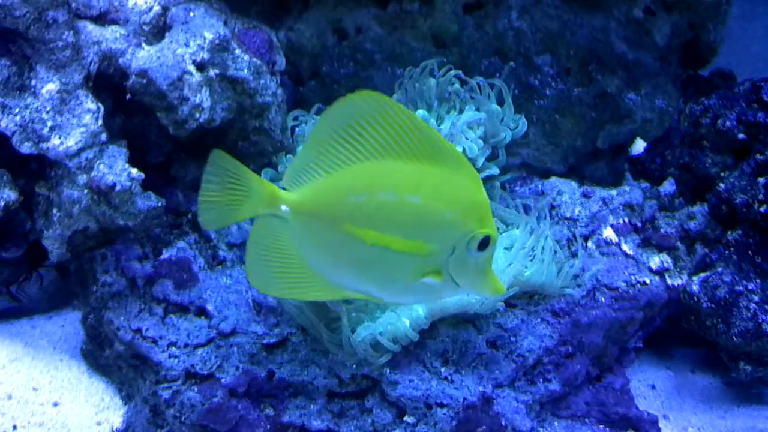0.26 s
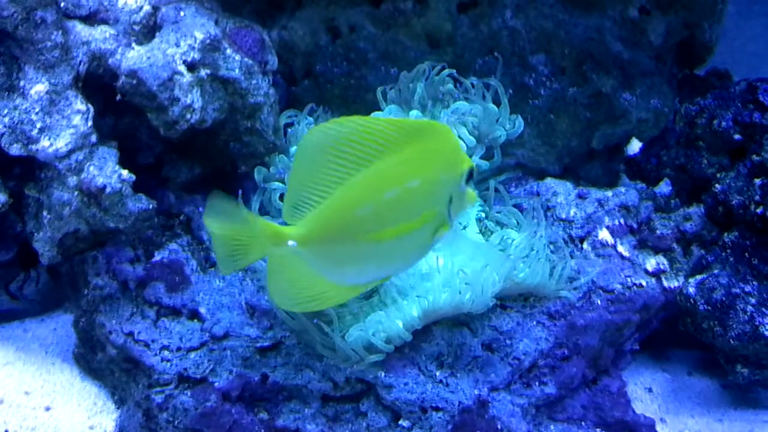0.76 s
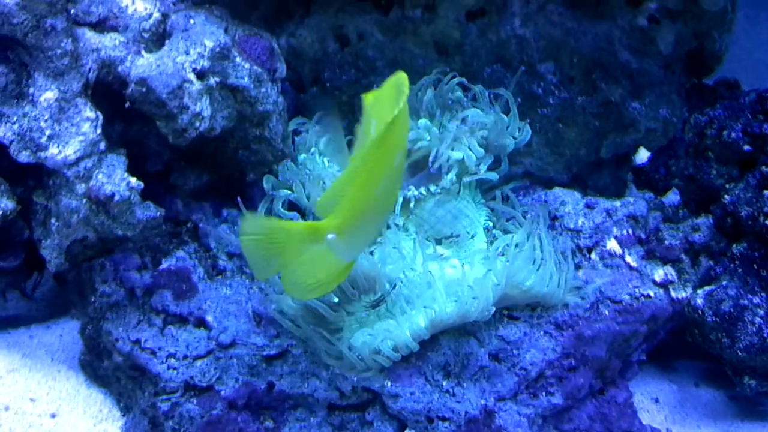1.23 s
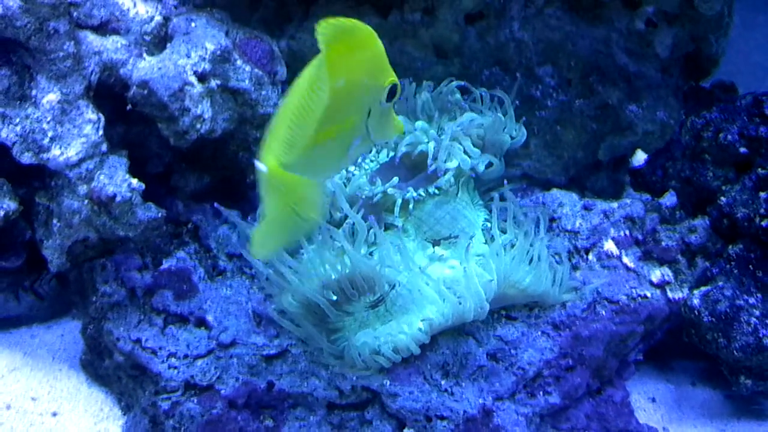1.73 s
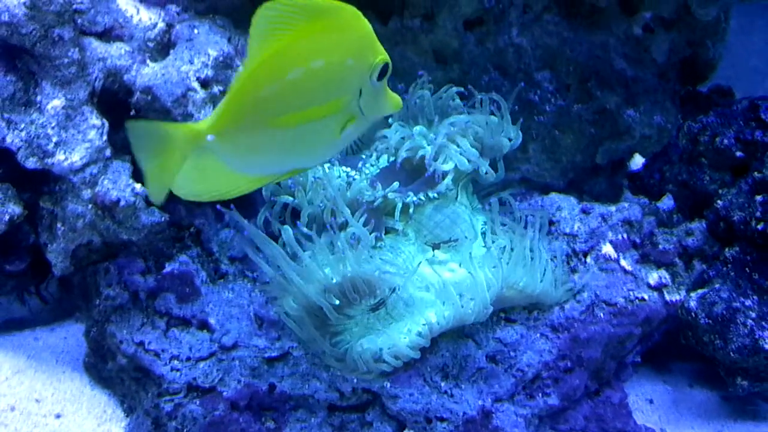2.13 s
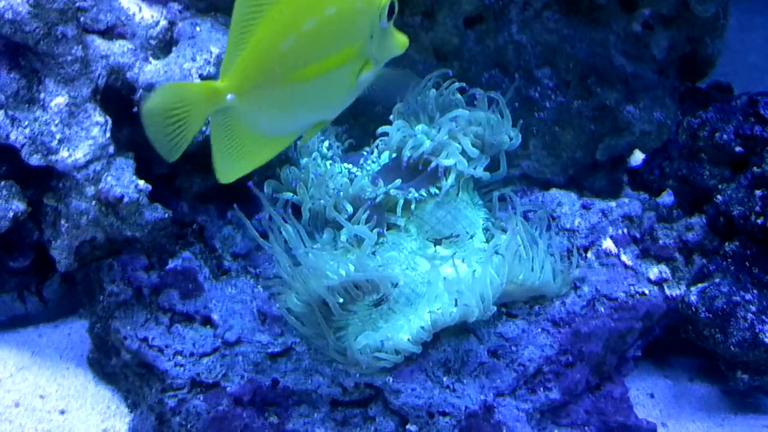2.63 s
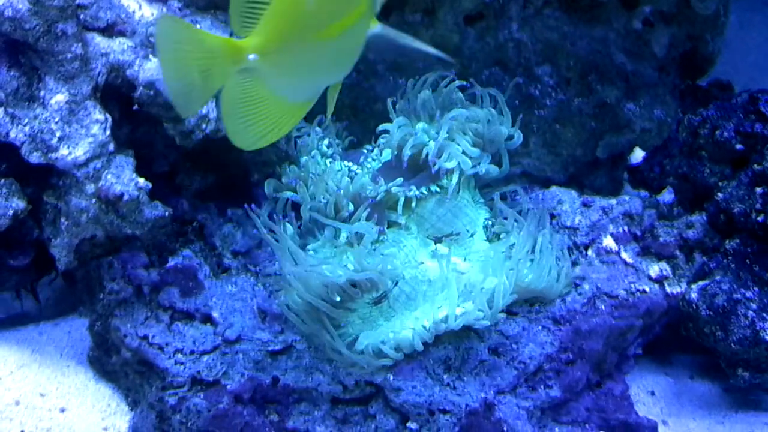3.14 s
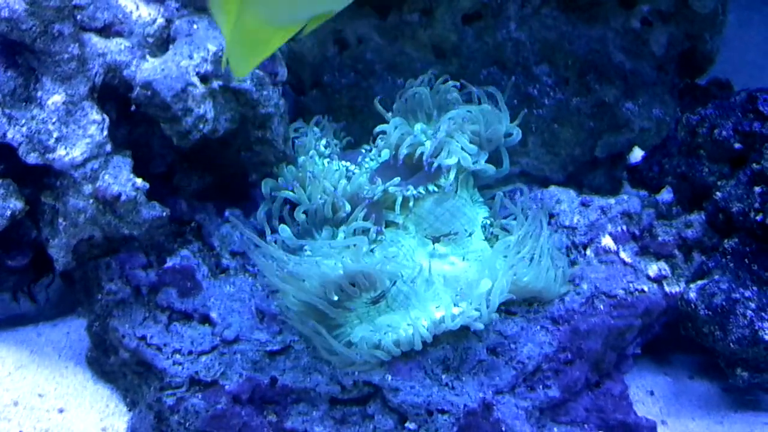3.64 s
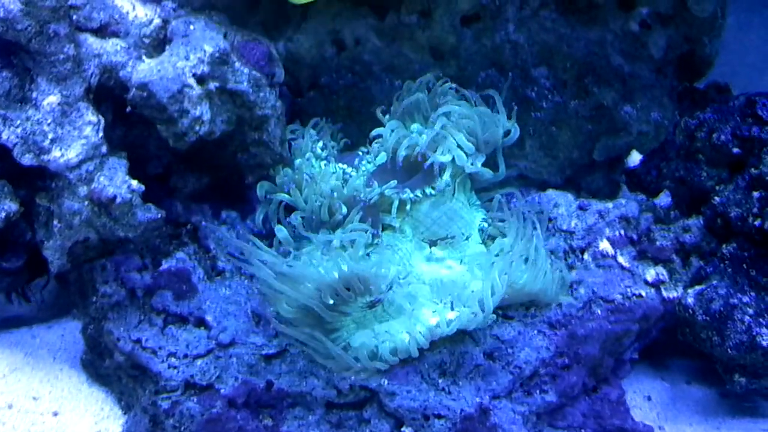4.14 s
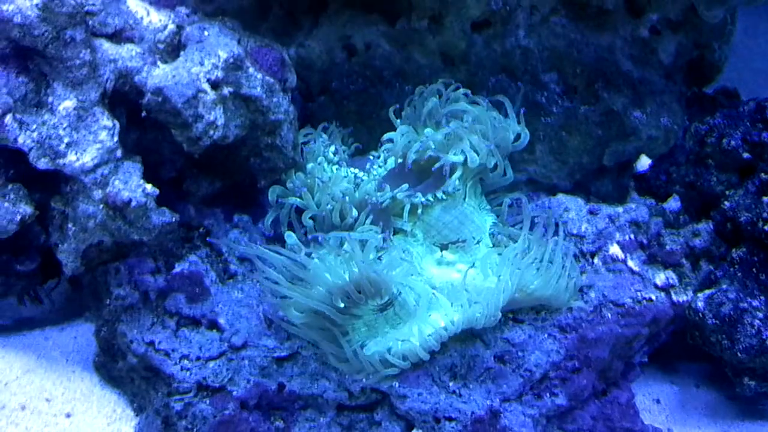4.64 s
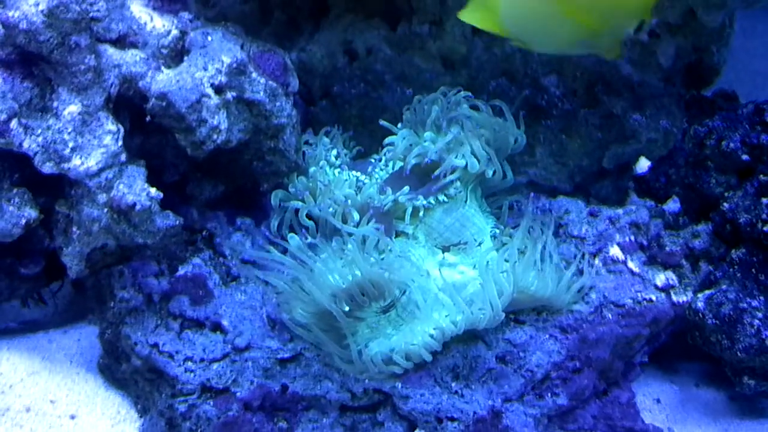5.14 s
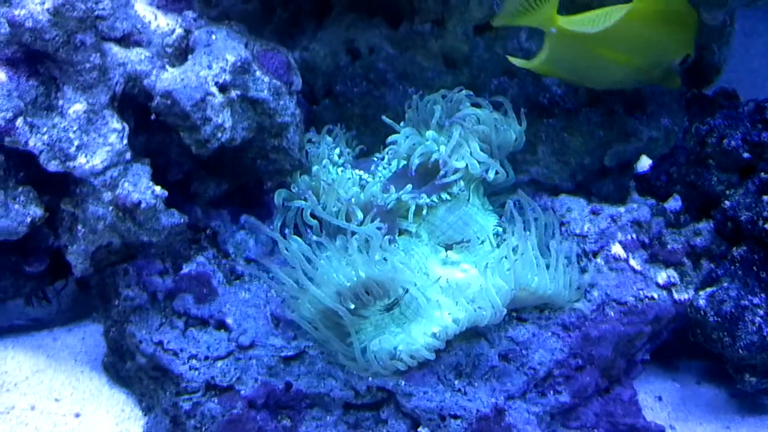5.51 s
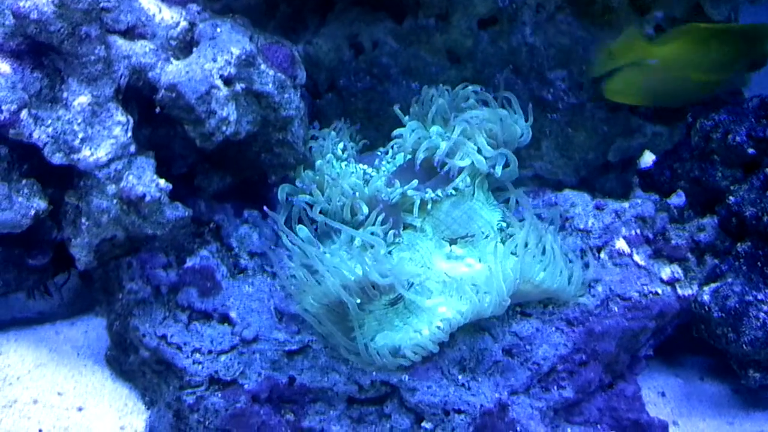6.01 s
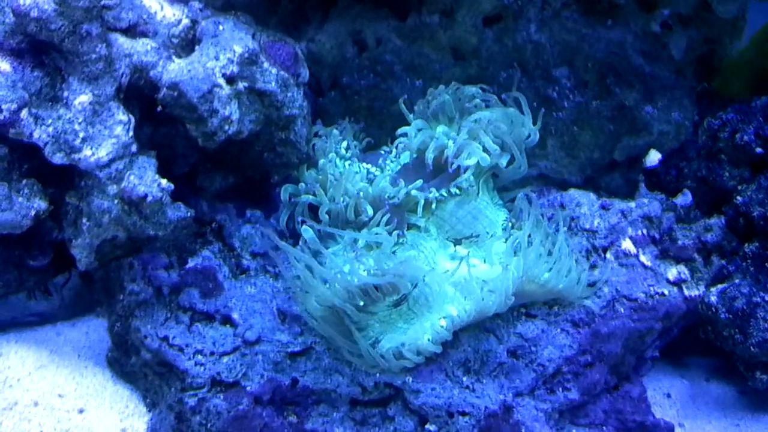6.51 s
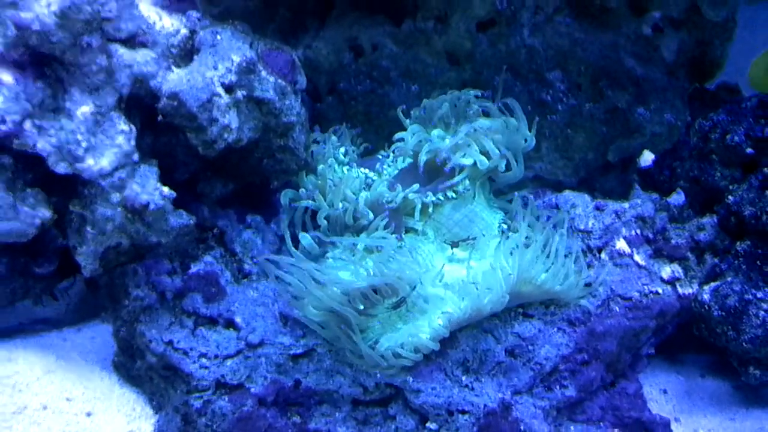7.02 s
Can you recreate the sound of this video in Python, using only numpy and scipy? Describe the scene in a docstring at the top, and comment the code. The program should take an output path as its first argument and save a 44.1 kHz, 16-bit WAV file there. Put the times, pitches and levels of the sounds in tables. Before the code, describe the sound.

Aquarium pumps drone with a low electric hum, buzz and soft hiss, fading in, with faint trickling, two tiny pops and a closing knock.

```python
"""A steady hum and buzz fills a quiet room, with faint whines, rumble, hiss and trickling water; it fades in.
Two small pops are heard, and knocks on the camera body at the end. Two microphone ports some distance apart
hear aquarium pumps and fans: motors and rotors are sums of sines, and the buzz is one repeated cycle.
Rumble and hiss are shaped noise, splashes are dying noise bursts, pops are short falling tones,
and knocks are two dying resonances."""
import sys
import numpy as np
from scipy import signal
from scipy.fft import rfft, irfft, next_fast_len
from scipy.io import wavfile
from scipy.ndimage import uniform_filter1d

SR = 44100
rng = np.random.default_rng(int(sys.argv[2]) if len(sys.argv) > 2 else 0)


def store_wav(level_fs):
    """Save 16-bit WAV to argv[1]."""
    pcm = np.round(np.clip(np.atleast_2d(level_fs), -1, 1) * 32767)
    wavfile.write(sys.argv[1], SR, pcm.T.astype(np.int16))


N = 320607  # length in samples

MAINS_HZ = 60.006
EDGE_HZ = 15740  # top of the heard band
# above IN_STEP_HZ the left channel falls about half a cycle further behind every HALF_TURN_HZ
IN_STEP_HZ, HALF_TURN_HZ = 1245, 1208
# the strongest motor tones, levels before the fade-in and wavering:
# (multiple of the mains, left level [dB rms], right level [dB rms])
MOTOR_TONES = [(2, -53.0, -51.0), (3, -46.2, -47.2), (4, -49.5, -61.8), (5, -54.3, -59), (6, -52.2, -54.5),
               (7, -58.8, -72), (8, -60.5, -84.9), (9, -54.9, -57.4), (10, -64.5, -66.6),
               (11, -61.8, -72.0), (13, -62.6, -65.1), (14, -69.4, -71.7), (16, -59.9, -64.2),
               (17, -60, -65.5), (18, -65.6, -74.8), (20, -66.4, -66.5), (29, -72.1, -70.7),
               (33, -74.9, -73.8), (37, -72.0, -71.7), (38, -74.0, -75.2)]


def gain_of(db):
    """Turns decibels into a factor that multiplies the sound wave."""
    return 10 ** (np.asarray(db) / 20)


def read(points, hz):
    """Reads a table's columns at any pitch, by straight lines over the logarithm of frequency."""
    f, *columns = np.transpose(points)
    return np.array([np.interp(np.log(hz + 1), np.log(f + 1), c) for c in columns])


def add(mix, s, sound):
    """Mixes a sound in at a time in seconds, cutting off what runs past the end."""
    part = mix[..., round(s * SR):][..., :sound.shape[-1]]
    part += sound[..., :part.shape[-1]]


def drift(fastest_hz, count):
    """Slow random curves of rms 1: sums of 16 slow sines, the slower ones stronger."""
    t = np.arange(0, N + 256, 256) / SR
    hz = np.geomspace(.2, fastest_hz, 16)
    angle = 2 * np.pi * (hz[:, None] * t + rng.random((count, 16, 1)))
    waves = np.sin(angle) / hz[:, None] ** 0.37
    curves = waves.sum(1)
    curves /= curves.std(1, keepdims=True)
    return [np.interp(np.arange(N) / SR, t, c) for c in curves]


def ports(hz):
    """How alike left and right are set to be (0-1), and by how many radians the left one leads."""
    # (frequency [Hz], lead of the left [radians])
    bass_lead = [(60, 3.4), (110, 0.7), (300, 0.11), (1100, 0.54)]
    # in narrow bands around these pitches left and right are made fully alike, in or out of phase; near # 2.45
    # kHz their sum falls silent: whole half turns, within alike_hz, blending out over alike_fade_hz, only #
    # below alike_top_hz
    alike_hz, alike_fade_hz, alike_top_hz = 112, 195, 4000
    # elsewhere: (frequency [Hz], left-right likeness [0-1])
    likeness = [(60, 0.8), (300, 0.56), (1100, 0.78), (1640, 0.54), (2140, 0.87), (2650, 0.99),
                (2900, 0.47), (3360, 0.83), (4050, 0.57), (4730, 0.83), (6700, 0), (7300, 0.58),
                (11800, 0.23), (15800, 0.3)]
    turns = (hz - IN_STEP_HZ) / HALF_TURN_HZ
    whole = np.maximum(np.round(turns), 0)
    distance_hz = abs(turns - whole) * HALF_TURN_HZ
    alike = np.clip(1 - (distance_hz - alike_hz) / alike_fade_hz, 0, 1) * (hz < alike_top_hz)
    usual_likeness = np.clip(read(likeness, hz)[0], 0, 1)
    usual_lead = np.where(turns < 0, read(bass_lead, hz)[0], -np.pi * turns)
    usual = np.array([usual_likeness, usual_lead])
    fully_alike = np.array([np.ones_like(whole), -np.pi * whole])
    return (1 - alike) * usual + alike * fully_alike


def port_pair(left, other, level_db, hz):
    """Spectra at the two ports: partly shared, phase-shifted, and equally loud where fully shared."""
    same, lead = ports(hz)
    right = same * left * np.exp(-1j * lead) + np.sqrt(1 - same ** 2) * other
    even = same ** 20  # near 1 only where left and right are almost fully alike
    return np.array([left, right]) * gain_of((1 - even) * level_db + even * level_db.mean(0))


def port_noise(spectrum):
    """Random noise shaped to a spectrum for each port, with cabinet and housing resonances lifting it."""
    # (resonance [Hz], width [Hz], left lift [dB], right lift [dB])
    housings = [(152, 15, 4, 4), (200, 15, 4, 4), (295, 24, 6, 6), (340, 12, 3, 3), (411, 18, 10.5, 7.5),
                (432, 10, 4, 4), (525, 30, 6, 6), (770, 50, 5, 4), (900, 40, 3, 3), (1490, 60, 3, 3),
                (1950, 150, 2, 2), (6110, 50, 3, 5), (12520, 50, 3, 2), (14255, 70, 2, 8),
                (14530, 90, 2, 7)]
    size = next_fast_len(N)
    hz = np.fft.rfftfreq(size, 1 / SR)
    level_db = read(spectrum, hz)
    for peak_hz, width, *lift_db in housings:
        level_db = level_db + np.outer(lift_db, 1 / (1 + (2 * (hz - peak_hz) / width) ** 2))
    left, other = rfft(rng.standard_normal((2, size)))
    return irfft(port_pair(left, other, level_db, hz) * np.sqrt(SR / 2), size)[:, :N]


def patchy(x, patch_db, count):
    """Raises and lowers random patches, count times 86 Hz wide and under a tenth of a second long."""
    z = signal.stft(x, nperseg=512)[2]
    patches = rng.standard_normal(z.shape[:0:-1]).T  # one pattern for both ports
    for _ in range(2):
        patches = uniform_filter1d(patches, size=count, axis=0)
        patches = uniform_filter1d(patches, size=8, axis=1)
    lifted = z * gain_of(patch_db * patches / patches.std())
    return signal.istft(lifted, nperseg=512)[1][:, :N]


def tones(rows, wander, waver_db, scatter):
    """Sines with phases scattered over a share of a cycle, whose pitch and level waver a little."""
    out, t = np.zeros((2, N), np.float32), np.arange(N) / SR
    slips, swells = drift(3.03, count=2), drift(6, count=4)
    clocks = [t + wander * np.cumsum(s) / SR for s in slips]  # time running slightly fast or slow
    gains = [np.sqrt(2) * gain_of(waver_db * s).astype(np.float32) for s in swells]  # rms to peak
    for k, (hz, left_db, right_db, lead) in enumerate(rows):
        cycles = hz * clocks[k % 2] + scatter * rng.random()
        angle = (2 * np.pi * (cycles % 1)).astype(np.float32)
        out[0] += gain_of(left_db) * gains[k % 4] * np.sin(angle)
        out[1] += gain_of(right_db) * gains[k % 4] * np.sin(angle - lead)
    return out


def air_and_water():
    """Low noise as the rumble of the housings, and higher noise as hiss that flickers with the flow."""
    # both before the housing lift, patches, drift and fade-in:
    # (frequency [Hz], left density [dB per Hz], right density [dB per Hz])
    rumble_spectrum = [(35, -100, -99), (55, -91, -88), (79, -85, -82.5), (112, -87, -80),
                       (138, -75.5, -79), (218, -71, -71.5), (360, -69, -73.5), (480, -76, -79),
                       (586, -76.5, -79), (847, -82.5, -84.5), (990, -84.5, -86), (1190, -83, -83),
                       (1415, -91, -90.5), (1486, -91, -88), (1720, -110, -110)]
    hiss_spectrum = [(1350, -110, -110), (1480, -90.5, -89), (2170, -91, -93.5), (2400, -88, -92),
                     (3670, -93.5, -93.5), (4600, -93, -88.5), (5720, -99.5, -94), (6950, -91.5, -100),
                     (8900, -96, -97), (9700, -99.3, -99.7), (13000, -102.3, -102.2), (13700, -103, -103),
                     (14600, -102, -102), (15700, -102.5, -102)]
    slow, flicker = drift(4.3, count=1)[0], drift(14, count=1)[0]
    rumble = patchy(port_noise(rumble_spectrum), patch_db=1.4, count=2) * gain_of(0.43 * slow)
    hiss = patchy(port_noise(hiss_spectrum), patch_db=1.3, count=16) * gain_of(0.45 * flicker)
    return rumble + hiss


def buzz():
    """A faint buzz: one mains cycle of weak multiples with scattered levels, repeated."""
    # typical level before scatter, evening out and fade-in: (frequency [Hz], level [dB rms])
    buzz_levels = [(1200, -83), (1900, -78), (2500, -82), (3100, -81), (4500, -85), (6000, -89),
                   (7500, -85), (9300, -91.5), (9600, -110)]
    count = 4096  # points in the cycle
    k = np.arange(count // 2 + 1)
    strong = np.isin(k, [row[0] for row in MOTOR_TONES])
    weak = (k > 13) & (k * MAINS_HZ < EDGE_HZ) & ~strong
    level_db = read(buzz_levels, k * MAINS_HZ) + 4.2 * rng.standard_normal((2, len(k)))
    left, other = weak * np.exp(2j * np.pi * 0.59 * rng.random((2, len(k))))
    cycle = irfft(port_pair(left, other, level_db, k * MAINS_HZ)) * count / np.sqrt(2)
    place = np.arange(N) * MAINS_HZ / SR % 1 * count
    return np.array([np.interp(place, np.arange(count), c, period=count) for c in cycle])


def rotors():
    """Blade tones that weaken with pitch; the higher ones are equally loud at both ports."""
    # four rotors, levels before the wavering and fade-in: (base pitch [Hz], multiples heard,
    # left level of the lowest one [dB rms], right level of the lowest one [dB rms])
    rotor_tones = [(130.6, (4, 5, 6), -63.5, -66.5), (228.15, (2, 3, 4, 8), -62.5, -64.5),
                   (237.2, (3, 4, 6, 8, 11, 15), -63.5, -65.5), (313.6, (2, 4, 7), -68, -74)]
    db_per_octave = -9
    rows = []
    for base_hz, multiples, *db in rotor_tones:
        for k in multiples:
            hz = k * base_hz
            sides = np.array(db) if hz < IN_STEP_HZ else np.full(2, np.mean(db))
            levels = sides + db_per_octave * np.log2(k / multiples[0])
            rows.append((hz, *levels, ports(hz)[1]))
    return tones(rows, wander=0.00062, waver_db=2.5, scatter=0.97)


def splash(db, hz, width, t60):
    """A narrow band of noise that starts within a millisecond and dies by 60 dB in t60 seconds."""
    t = np.arange(6000) / SR
    band = signal.butter(1, [hz - width / 2, hz + width / 2], "bandpass", fs=SR, output="sos")
    noise = signal.sosfilt(band, rng.standard_normal(len(t) + 999))[999:]  # skips the filter's start
    return gain_of(db - 60 * t / t60) * np.minimum(t / .001, 1) * noise / noise.std()


def trickle(per_s, faint_db):
    """Louder splashes at set times and fainter ones at random, shifted in phase between the ports."""
    # level is the noise's rms before onset, decay and fade-in:
    # (time [s], level [dB], pitch [Hz], time to die by 60 dB [s])
    loud_splashes = [(2.8015, -48, 3420, .22), (2.802, -53, 3950, .07), (2.802, -57, 4350, .05),
                     (2.805, -51, 1550, .18), (3.0405, -50, 4000, .11), (3.038, -52, 4900, .06),
                     (3.519, -57, 3330, .25), (3.607, -55, 3150, .09), (4.389, -57.5, 3390, .07),
                     (5.079, -54, 5300, .1), (5.516, -54, 4700, .1), (6.479, -54, 5200, .1)]
    size = next_fast_len(N)
    water = np.zeros(size)
    for s, db, hz, t60 in loud_splashes:
        add(water, s, splash(db, hz, .045 * hz, t60))  # band width is a share of the pitch
    for when, pitch, softness, chance in rng.random((60, 4)):
        if chance < per_s * N / SR / 60:  # gives per_s splashes a second on average
            add(water, when * N / SR, splash(faint_db - 5 * softness, 3600 * 2.4 ** pitch, 900, .12))
    lead = ports(np.fft.rfftfreq(size, 1 / SR))[1]
    return irfft(rfft(water) * np.exp(-1j * np.outer([0, 1], lead)), size)[:, :N]


def pops():
    """Small pops: a few cycles of falling pitch that swell and fade within milliseconds."""
    # (time of the centre [s], peak level [dB], pitch at the centre [Hz], half length [s])
    pop_list = [(3.9760, -28.5, 1200, .0011), (7.0442, -38.5, 1000, .001)]
    fall_hz_per_s = 200000
    out, t = np.zeros((2, N)), np.arange(-441, 441) / SR
    late = np.array([[.0003], [0]])  # seconds: the pops swell later at the left port
    for s, db, hz, half in pop_list:
        swell = np.exp(-((t - late) / half) ** 2)
        wave = np.cos(2 * np.pi * (hz - fall_hz_per_s * t / 2) * t)
        add(out, s + t[0], gain_of(db) * swell * wave)
    return out


def knocks():
    """Short pushes make the camera body ring at two pitches, with opposite swings at the two ports."""
    # level before the push, bass filter and rescaling:
    # (pitch [Hz], level [dB], time to die by 60 dB [s], direction of the first swing [-1 or 1])
    body = [(235, 0, .0133, -1), (124, -26, .085, 1)]
    # (time [s], left peak level [dB], right peak level [dB])
    knock_list = [(7.1808, -15.3, -14), (7.2204, -36, -29)]
    out, t = np.zeros((2, N)), np.arange(8000) / SR
    push = 1 - np.exp(-(t / .0054) ** 2)  # builds over 5.4 ms
    ring = 0
    for hz, db, t60, swing in body:
        ring = ring + swing * gain_of(db - 60 * t / t60) * np.sin(2 * np.pi * hz * t) * push
    # the microphone drops deep bass
    ring = signal.sosfilt(signal.butter(3, 65, "highpass", fs=SR, output="sos"), ring)
    ring = ring / abs(ring).max()
    for s, left_db, right_db in knock_list:
        add(out, s + .0002, np.outer([-gain_of(left_db), 0], ring))  # the left starts slightly later
        add(out, s, np.outer([0, gain_of(right_db)], ring))
    return out


def motors():
    """Strong multiples of the mains, partly in step: one jolt a cycle; the highest are opposite at the ports."""
    rows = []
    for k, *db in MOTOR_TONES:
        if k in (4, 6, 8):
            lead = 2.0  # radians: these reach the left port early
        elif k > 20:
            lead = np.pi
        else:
            lead = ports(k * MAINS_HZ)[1]
        rows.append((k * MAINS_HZ, *db, lead))
    return tones(rows, wander=1e-5, waver_db=0.6, scatter=0.27)


def scene():
    """Sums all the sources at the two ports."""
    background = air_and_water() + buzz() + rotors()
    water = trickle(per_s=7, faint_db=-56)
    return background + water + pops() + knocks() + motors()


def record(dry):
    """Fades the scene in, adds a faint steady noise that does not fade, then cuts the highest treble."""
    # density before the housing lift: (frequency [Hz], left density [dB per Hz], right density [dB per Hz])
    steady_spectrum = [(1000, -135, -135), (6000, -124, -124), (15700, -122, -122)]
    fade_s, fade_db_per_s = 2.363, 9  # the level climbs steadily until fade_s
    fade_db = fade_db_per_s * np.minimum(np.arange(N) / SR - fade_s, 0)
    faded = dry * gain_of(fade_db) + port_noise(steady_spectrum)
    treble_cut = signal.firwin(2047, EDGE_HZ, window=("kaiser", 9), fs=SR)
    return signal.oaconvolve(faded, treble_cut[None], "same")


dry = scene()
out = record(dry)
store_wav(out)
```